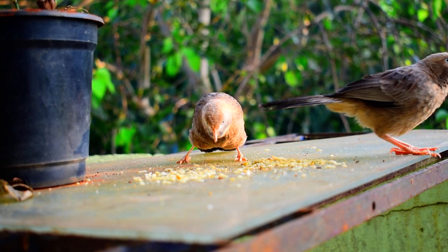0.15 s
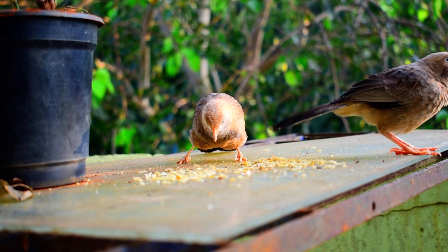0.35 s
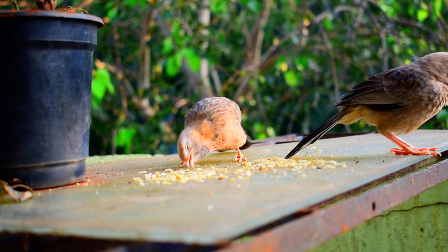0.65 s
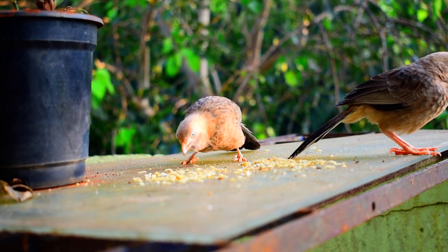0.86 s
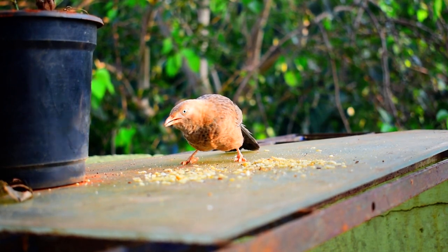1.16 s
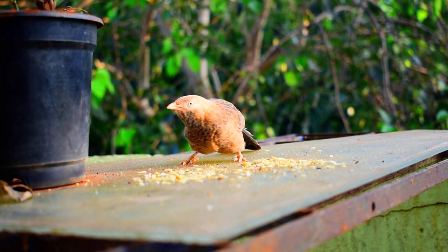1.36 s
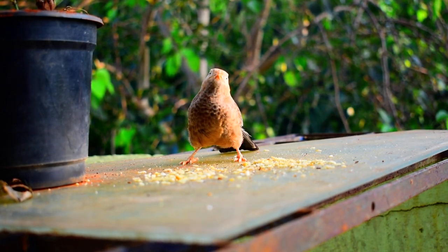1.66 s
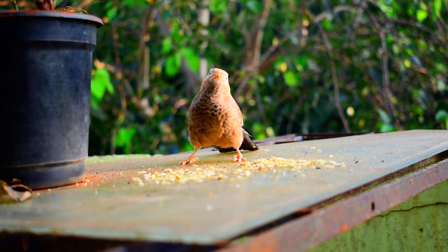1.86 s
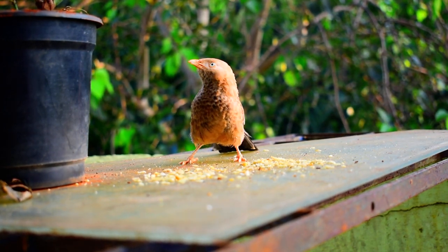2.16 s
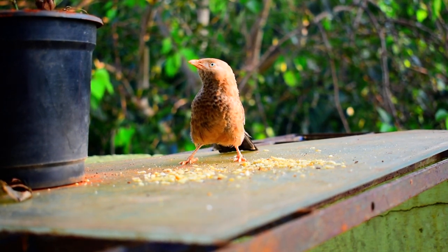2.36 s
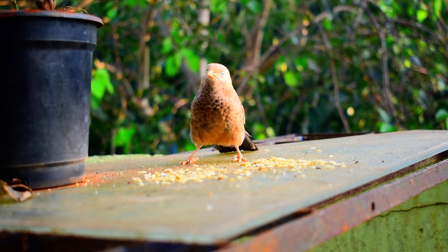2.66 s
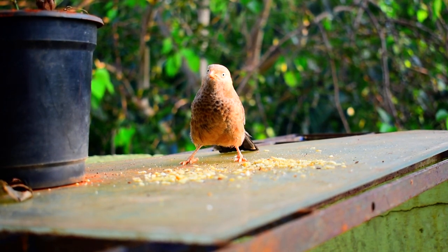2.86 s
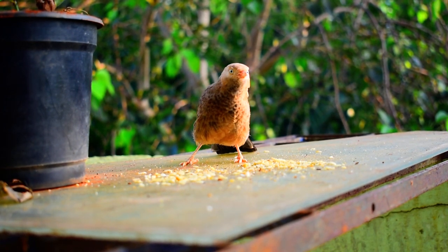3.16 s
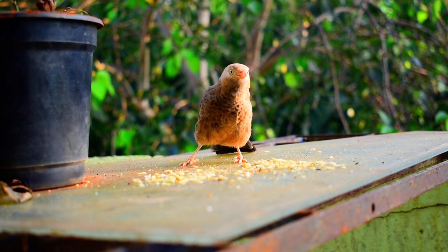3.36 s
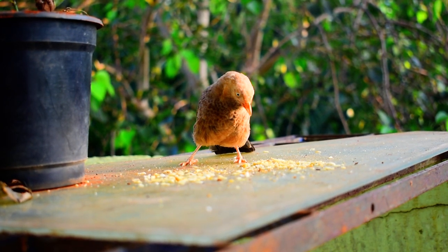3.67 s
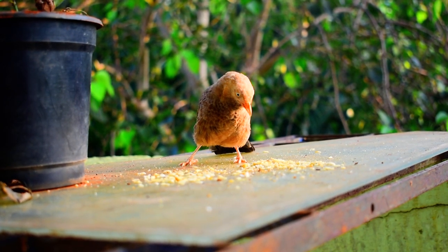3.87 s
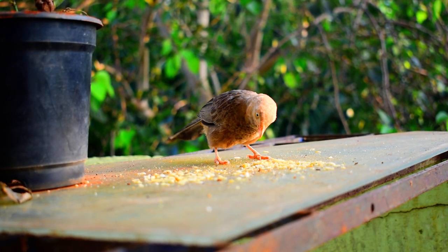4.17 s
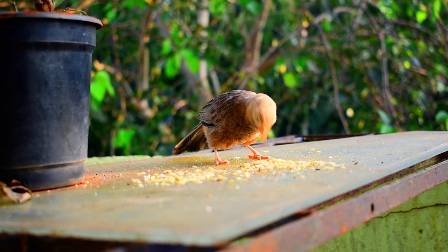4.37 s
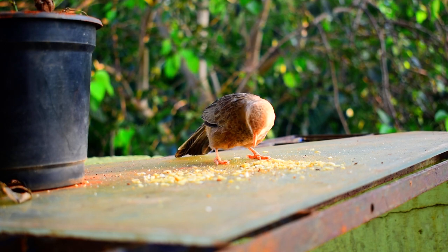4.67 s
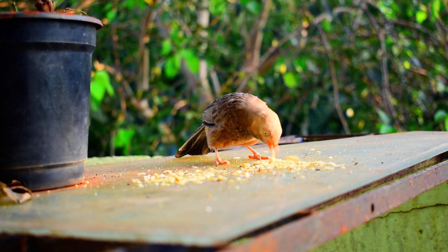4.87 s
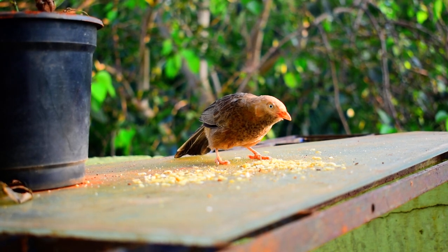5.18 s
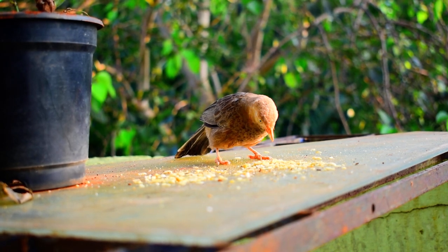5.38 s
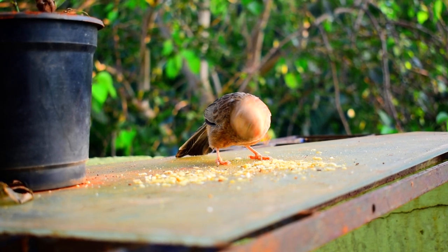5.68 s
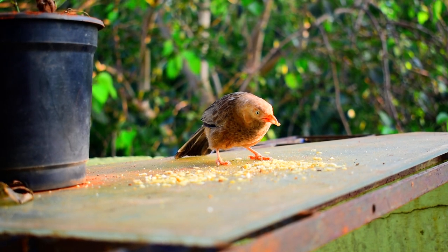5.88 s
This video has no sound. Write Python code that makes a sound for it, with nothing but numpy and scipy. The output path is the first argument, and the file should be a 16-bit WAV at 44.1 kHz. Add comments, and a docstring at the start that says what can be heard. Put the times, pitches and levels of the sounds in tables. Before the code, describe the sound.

A flock of birds calls from garden trees, with quick falling whistles and raspy nasal squeals overlapping in a light echo. One bird faintly pecks grain off a ledge. The calls thin out past the middle, then return louder as a nearer bird gives two sharp chips. Behind them are a low outdoor hum, far-off swishes, soft distant hoots and a thin insect hiss.

```python
"""Babblers round a garden

A flock of babblers calls from the trees: falling piped notes, whines and nasal squeals overlap in
the echo of the yard. A nearer bird gives one faint chip and two sharp ones, and one bird pecks grain
off a ledge. Behind them are a low outdoor hum, far-off swishes, a thin insect hiss and distant calls."""
import sys
import numpy as np
from scipy import signal
from scipy.fft import rfft, irfft, next_fast_len
from scipy.io import wavfile

SR = 44100
rng = np.random.default_rng(int(sys.argv[2]) if len(sys.argv) > 2 else 0)


def store_wav(level_fs):
    """Save 16-bit WAV to argv[1]."""
    pcm = np.round(np.clip(np.atleast_2d(level_fs), -1, 1) * 32767)
    wavfile.write(sys.argv[1], SR, pcm.T.astype(np.int16))


N = 265903
TIME = np.arange(N) / SR


def from_db(db):
    """Turn decibels into a number to multiply by."""
    return 10 ** (np.asarray(db) / 20)


def rms_one(x):
    """Scale a sound to an average power of 1."""
    return x / np.sqrt(np.mean(x ** 2) + 1e-20)


def at_hz(points, hz):
    """Read between the rows of a table, with frequency spaced by octaves."""
    freqs, values = np.transpose(points)
    return np.interp(np.log(hz + 1), np.log(freqs), values)


def coloured_noise(spectrum):
    """Noise of power 1, with its lows and highs shaped by a table."""
    size = next_fast_len(N)
    hz = np.arange(size // 2 + 1) * SR / size
    shaped = rfft(rng.standard_normal(size)) * from_db(at_hz(spectrum, hz))
    return rms_one(irfft(shaped, size)[:N])


def band_pass(x, low_hz, high_hz):
    """Keep the part of a sound between two frequencies."""
    return signal.sosfilt(signal.butter(2, [low_hz, high_hz], "band", fs=SR, output="sos"), x)


def drift(rate_hz):
    """A smooth random wander, typically about 1 in size."""
    smoothing = signal.butter(2, rate_hz, fs=SR, output="sos")
    return rms_one(signal.sosfilt(smoothing, rng.standard_normal(N)))


def add(track, start_s, sound):
    """Mix a sound into a track at its start time."""
    at = max(round(start_s * SR), 0)
    track[at:at + len(sound)] += sound[:max(N - at, 0)]


def syllable(length_s, pitches, waver, attack, release):
    """Phase and loudness of a note bent through three pitches; attack and release are shares of it."""
    progress = np.linspace(0, 1, int(length_s * SR))
    hz = np.polyval(np.polyfit([0, .5, 1], pitches, 2), progress) * (1 + waver[:len(progress)])
    swell = np.sin(np.pi / 2 * np.clip(progress / attack, 0, 1))
    fade = np.sin(np.pi / 2 * np.clip((1 - progress) / release, 0, 1))
    return 2 * np.pi * np.cumsum(hz) / SR, swell * fade


def arc(hz, glide_hz, arch_hz):
    """Start, middle and end pitch of a gliding note that arches up in the middle."""
    return [hz - arch_hz - glide_hz / 2, hz, hz - arch_hz + glide_hz / 2]


# How long the yard's echo takes to fade by 60 dB: frequency_hz, fade_s
ECHO_FADE = [(1500, 0.43), (3000, 0.73), (4300, 0.54), (6400, 0.77), (9000, 0.45), (14000, 0.57)]


def yard(x, direct_db, echo_db, build_s=0.0039, early_db=-2, early_s=0.0052):
    """The sound itself, a few quick reflections, then an echo scattered by leaves and walls."""
    t, edges_hz = TIME[:SR], np.geomspace(1000, 16000, 9)
    echo, early = np.zeros(SR), from_db(early_db) * np.exp(-t / early_s)
    for low, high in zip(edges_hz, edges_hz[1:]):
        band = band_pass(rng.standard_normal(SR), low, high)
        tail = from_db(-60 * t / at_hz(ECHO_FADE, np.sqrt(low * high)))
        decay = (tail + early) * (1 - np.exp(-t / build_s))
        echo += band * decay / np.sqrt(np.sum(decay ** 2))
    return from_db(direct_db) * x + from_db(echo_db) * signal.fftconvolve(x, echo)[:N]


# The tone of the outdoor hum: frequency_hz, relative_db
HUM_COLOUR = [(25, -41), (55, -19.5), (110, -10.5), (230, -2), (370, 1.5), (560, -3.5), (950, -8.5),
              (1500, -6.5), (2500, -11), (4000, -12.5), (5500, -15.5), (7500, -18.5), (11000, -34.5),
              (15500, -37)]


def outdoor_hum(level_db=-52):
    """A steady wash of noise, strongest in the low middle."""
    return from_db(level_db) * coloured_noise(HUM_COLOUR)


# The tone of the swishes: frequency_hz, relative_db
SWISH_TONE = [(40, -43), (150, -18), (270, -6.5), (550, -0.5), (1000, 0.5), (1500, -4.5), (2500, -9.5),
              (5000, -31), (12000, -67)]
# Each far-off swish: start_s, hold_s, level_db
FAR_SWISHES = [(0.058, 0.024, -50.5), (0.722, 0.47, -48), (1.93, 0.33, -47.5), (3.215, 0.16, -49),
               (4.423, 0.33, -50)]


def swishes(attack_s=0.079, release_s=.17, bed_db=-54.5):
    """Each swish swells, holds and dies away over a faint, steady bed of the same noise."""
    power = from_db(bed_db) ** 2
    for start_s, hold_s, level_db in FAR_SWISHES:
        swell = np.clip((TIME - start_s) / attack_s, 0, 1)
        fade = np.exp(-np.maximum(TIME - start_s - attack_s - hold_s, 0) / release_s)
        power = power + (from_db(level_db) * swell * fade) ** 2
    return np.sqrt(power) * coloured_noise(SWISH_TONE)


def insects(centre_hz=8700, width_hz=850, level_db=-61):
    """A steady chorus of insects blends into one thin, high hiss."""
    hiss = band_pass(rng.standard_normal(N), centre_hz - width_hz / 2, centre_hz + width_hz / 2)
    return from_db(level_db) * rms_one(hiss)


# Each distant call, plus one short high whine of the flock at 0.196 s: start_s, length_s, pitch_hz, level_db,
# shake_share (of the pitch)
DISTANT_CALLS = [(.095, 0.12, 957, -53, 0.032), (0.196, 0.046, 3720, -38, 0.01),
                 (.473, .12, 765, -51.5, 0.013), (1.2, .22, 510, -46, 0.088),
                 (1.25, 0.18, 350, -47.5, 0.21), (2.041, 0.15, 971, -46, 0.022),
                 (2.147, 0.33, 253, -54, 0.055), (2.376, 0.49, 1056, -53, 0.0019),
                 (3.259, 0.29, 962, -46, 0.055), (3.808, 0.23, 956, -57, .01),
                 (4.986, 0.1, 1730, -48, 0.026)]


def distant_calls(overtone_db=-22):
    """Soft hoots and cries: the more the pitch shakes, the hoarser they sound."""
    out, waver = np.zeros(N), drift(137)
    for start_s, length_s, hz, level_db, shake_share in DISTANT_CALLS:
        shake = shake_share * np.roll(waver, -int(start_s * SR))
        phase, envelope = syllable(length_s, [hz] * 3, shake, attack=.35, release=.35)
        voice = np.sin(phase) + from_db(overtone_db) * np.sin(2 * phase)
        add(out, start_s, from_db(level_db) * envelope * voice)
    return out


# Each peck or claw tap: start_s, relative_db, centre_hz
LEDGE_TAPS = [(0.101, -48.5, 2800), (0.134, -53, 2600), (.433, -54, 5330), (.591, -46.5, 2570),
              (3.525, -53, 4800), (4.047, -46.5, 2460), (4.063, -49.5, 2570), (4.326, -61, 5500),
              (4.68, -64, 4500), (4.892, -57, 7000)]


def taps(rise_s=.001, spread=1.38, ring_cycles=210):
    """Beak and claws tick on the ledge: tiny bursts of noise, and the higher ones die sooner."""
    out, t = np.zeros(N), TIME[:SR // 10]
    for start_s, level_db, hz in LEDGE_TAPS:
        fade_s = ring_cycles / hz
        envelope = from_db(level_db - 60 * t / fade_s) * (1 - np.exp(-t / rise_s))
        scratch = envelope * rng.standard_normal(len(t))
        add(out, start_s, band_pass(scratch, hz / spread, hz * spread))
    return out


# How one chip changes as it goes: time_s, pitch_hz, relative_db, rasp_db
CHIP_PATH = [(0, 4336, 9, -23), (.008, 4053, -2.5, -8), (.015, 3010, -3.5, -13), (0.019, 2192, -13, -19),
             (0.025, 3013, 0.5, -29), (0.03, 3150, 1.5, -21), (.034, 2769, -3, -23),
             (0.042, 2717, -1.5, -24), (0.05, 1890, -7.5, -18)]
# Each chip of the nearer bird: start_s, level_db
NEAR_CHIPS = [(3.702, -47), (5.052, -25), (5.355, -23)]


def chips(overtone_db=-32, undertone_db=-2):
    """A fast zigzag dive in pitch; the voice breaks into a rasp with a tone an octave below."""
    times_s, *columns = np.transpose(CHIP_PATH)
    t = np.arange(int(times_s[-1] * SR)) / SR
    hz, shape_db, rasp_db = [np.interp(t, times_s, column) for column in columns]
    out, rasp = np.zeros(N), from_db(rasp_db)
    soft_ends = signal.windows.tukey(len(t), .25)
    for start_s, level_db in NEAR_CHIPS:
        shake = .13 * np.sqrt(rasp) * drift(900)[-len(t):]
        phase = 2 * np.pi * np.cumsum(hz * (1 + shake)) / SR
        undertone = from_db(undertone_db) * rasp * np.sin(phase / 2)
        voice = np.sin(phase) + from_db(overtone_db) * np.sin(2 * phase) + undertone
        add(out, start_s, from_db(level_db + shape_db) * voice * soft_ends)
    return out


# A squeal's overtones, at 2, 3 and 4 times its pitch: relative_db
SQUEAL_OVERTONES = [1, -18.5, -30.5]
# Its rasp, at 1.5, 2.5, 3.5 and 4.5 times its pitch: relative_db
RASP_TONES = [-12.5, -17.5, -32, -59]
# Each squeal: start_s, length_s, pitch_hz, glide_hz (below zero falls), level_db
FLOCK_SQUEALS = [(0, 0.017, 3116, -105, -33), (0.443, 0.097, 3020, -180, -39.5),
                 (0.601, 0.075, 3400, -180, -44.5), (0.657, 0.0584, 3110, -38, -35.5),
                 (0.713, 0.067, 3266, -230, -36.5), (0.908, 0.091, 3120, -200, -35.5),
                 (1.112, 0.095, 3210, -410, -35), (1.343, 0.11, 3177, -430, -36),
                 (1.571, .1, 3200, -470, -34), (1.807, 0.087, 3228, -470, -37),
                 (2.037, .11, 3206, -410, -39), (2.275, .094, 3195, -300, -39.5),
                 (2.508, 0.1, 3235, -390, -38.5), (2.734, 0.098, 3225, -76, -37),
                 (2.896, 0.062, 2897, -45, -36.5), (2.941, 0.11, 3197, -170, -37),
                 (3.264, .07, 3218, -390, -41), (3.879, 0.076, 3356, 100, -38),
                 (4.785, 0.092, 3122, 93, -37.5), (5.004, 0.1, 2990, 198, -39),
                 (5.105, 0.068, 3306, 45, -39), (5.295, 0.047, 3177, -170, -39.5),
                 (5.473, .084, 3087, -230, -39), (5.651, .1, 3198, -260, -40.5),
                 (5.869, 0.085, 3184, -310, -40.5)]


def squeals(usual_hz=3206, resonance_db_per_octave=53, rise_db_per_hz=0.0042, shift_db=5):
    """Nasal notes with a strong first overtone; every other vibration differs, which adds a rasp."""
    out, waver = np.zeros(N), 0.0066 * drift(250)
    for start_s, length_s, hz, glide_hz, level_db in FLOCK_SQUEALS:
        # A longer glide arches higher and shakes more.
        pitches = arc(hz, glide_hz, arch_hz=35.4 + 0.278 * abs(glide_hz))
        shake = np.roll(waver, -int(start_s * SR)) * (1 + abs(glide_hz) / 300)
        phase, envelope = syllable(length_s, pitches, shake, attack=.3, release=.12)
        # The lowest tone gains as the pitch nears the throat's resonance; a rising glide weakens it.
        lowest_db = -2.5 + resonance_db_per_octave * np.log2(hz / usual_hz) - rise_db_per_hz * glide_hz
        # Through the note, the overtones give way to the lowest tone.
        balance_db = shift_db * np.linspace(-.5, .5, len(phase))
        overtones = sum(from_db(db) * np.sin(k * phase) for k, db in enumerate(SQUEAL_OVERTONES, 2))
        voice = from_db(lowest_db + balance_db) * np.sin(phase) + from_db(-balance_db) * overtones
        rasp = sum(from_db(db) * np.sin((k + .5) * phase) for k, db in enumerate(RASP_TONES, 1))
        rasp_db = -19.5 if glide_hz > 0 else -1  # rising squeals are nearly clean
        add(out, start_s, from_db(level_db) * envelope * (voice + from_db(rasp_db) * rasp))
    return out * from_db(2.5 * drift(90))  # the loudness flutters


# A whistle's tones, at 1, 2 and 3 times its pitch: relative_db
WHISTLE_TONES = [0.5, -18.5, -37.5]
# Each piped note, a quick slide down: start_s, length_s, top_hz, landing_hz, level_db
PIPED_NOTES = [(0.825, 0.11, 4650, 4046, -36.5), (0.908, 0.047, 4710, 4390, -36.5),
               (1.03, 0.1, 5004, 4010, -36), (1.221, 0.087, 4640, 4055, -33.5),
               (1.383, 0.11, 4800, 3930, -34.5), (1.558, 0.058, 4746, 4074, -32),
               (1.74, 0.069, 4790, 4083, -33.5), (1.91, 0.094, 4760, 4036, -34),
               (2.076, .11, 4800, 4013, -34), (2.24, 0.075, 4784, 4070, -34.5),
               (2.415, 0.1, 5070, 4030, -32.5), (2.6, 0.051, 4700, 4277, -34),
               (2.737, 0.046, 4720, 4000, -30), (3.097, 0.042, 4780, 4175, -33),
               (3.244, 0.065, 4810, 4236, -34.5), (3.4, 0.053, 4540, 4173, -35.5),
               (4.513, 0.046, 4664, 4360, -34), (4.547, .045, 4220, 4084, -28.5),
               (5.034, 0.059, 4740, 4380, -28), (5.209, 0.11, 4943, 4160, -27),
               (5.389, 0.09, 5100, 4104, -25.5), (5.579, 0.091, 4890, 4050, -26.5),
               (5.746, 0.074, 4776, 3976, -24), (5.906, 0.072, 4830, 3960, -22)]
# Each whine (most hold, then droop): start_s, length_s, pitch_hz, glide_hz, level_db
WHINED_NOTES = [(1.135, .093, 3845, -170, -38), (1.478, 0.052, 3906, -300, -35),
                (1.72, 0.076, 3797, -78, -37), (2.259, .06, 3988, -380, -31.5),
                (2.562, 0.074, 3893, -130, -35.5), (2.913, 0.066, 4047, -350, -30),
                (3.199, .1, 4124, -650, -36.5), (3.489, 0.055, 3920, -27, -30),
                (3.553, 0.0394, 3805, -420, -41.5), (3.83, 0.064, 3795, -100, -35.5),
                (4.185, .043, 2210, 643, -51.5), (4.35, 0.074, 3422, -270, -51)]


def whistles(sag_share=.17, whine_bright_db=5, swell_db=3.5, brighten_db=3):
    """Piped notes and whines grow louder and brighter as they slide; the pitch stumbles, then steadies."""
    notes = []
    for start_s, length_s, top_hz, landing_hz, level_db in PIPED_NOTES:
        middle_hz = (top_hz + landing_hz) / 2 - sag_share * (top_hz - landing_hz)  # steep, then flat
        bright_db = 2.5 - 0.2 * (level_db + 33.5)  # louder notes are purer
        notes.append((start_s, length_s, [top_hz, middle_hz, landing_hz], level_db, bright_db))
    for start_s, length_s, hz, glide_hz, level_db in WHINED_NOTES:
        notes.append((start_s, length_s, arc(hz, glide_hz, arch_hz=27), level_db, whine_bright_db))

    out, waver = np.zeros(N), .075 * drift(90) + .055 * drift(400)
    for start_s, length_s, pitches, level_db, bright_db in notes:
        slide_share = min(abs(1 - pitches[2] / pitches[0]), .15)
        progress = np.linspace(0, 1, int(length_s * SR))
        mid_note = np.sqrt(np.abs(np.sin(np.pi * progress ** 1.29)))  # zero at both ends
        stumble = np.roll(waver, -int(start_s * SR))[:len(progress)] * slide_share * mid_note
        phase, envelope = syllable(length_s, pitches, stumble, attack=0.11, release=0.097)
        overtone_db = bright_db + brighten_db * (progress - .5)
        voice = sum(from_db(db + (k > 1) * overtone_db) * np.sin(k * phase)
                    for k, db in enumerate(WHISTLE_TONES, 1))
        add(out, start_s, from_db(level_db + swell_db * (progress - .5)) * envelope * voice)
    return out * from_db(1.8 * drift(100))  # the loudness flutters


def scene():
    """The flock arrives mostly as echo, dulled by leaves; chips, taps and distant calls echo less."""
    flock = yard(whistles(), direct_db=-2.5, echo_db=3.5) + yard(squeals(), direct_db=-5.5, echo_db=3)
    flock = signal.sosfilt(signal.butter(4, 13500, fs=SR, output="sos"), flock)
    near = yard(chips(), direct_db=2, echo_db=-1)
    ledge = yard(taps(), direct_db=18, echo_db=7)
    far = yard(distant_calls(), direct_db=-2, echo_db=-1)
    return (flock + near + ledge + far + insects() + outdoor_hum() + swishes())[None]


def record(dry, cutoff_hz=15700):
    """Cut the very highest treble steeply."""
    return signal.sosfilt(signal.ellip(10, .1, 80, cutoff_hz, fs=SR, output="sos"), dry)


dry = scene()
out = record(dry)
store_wav(out)
```